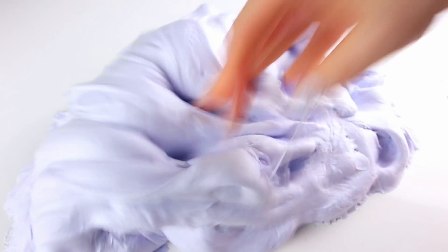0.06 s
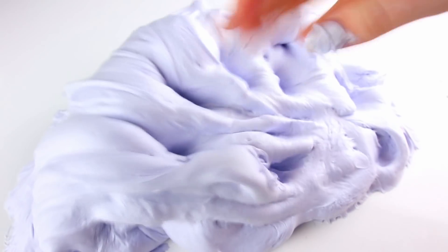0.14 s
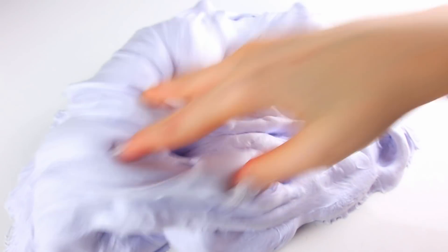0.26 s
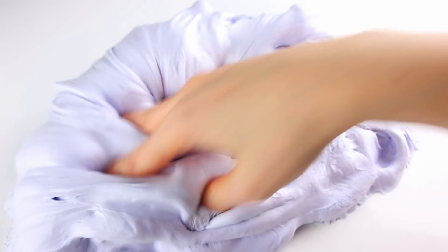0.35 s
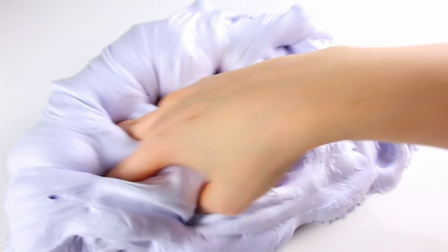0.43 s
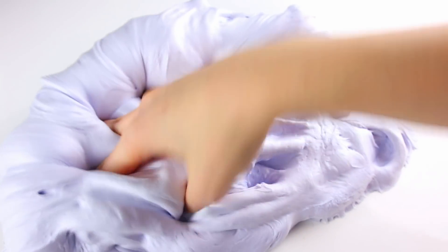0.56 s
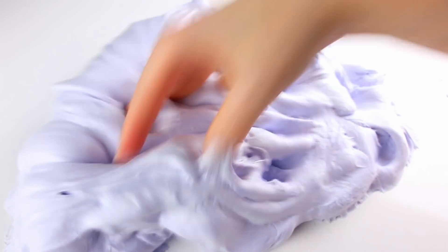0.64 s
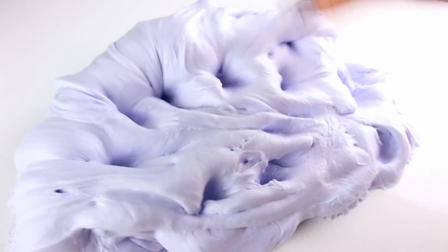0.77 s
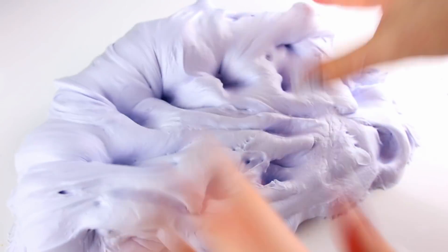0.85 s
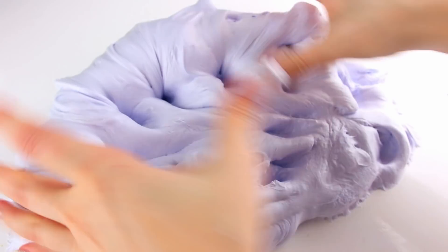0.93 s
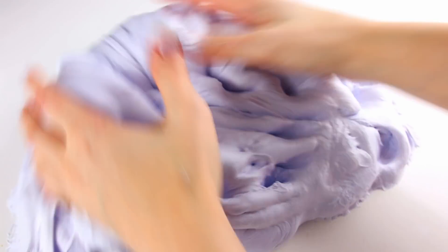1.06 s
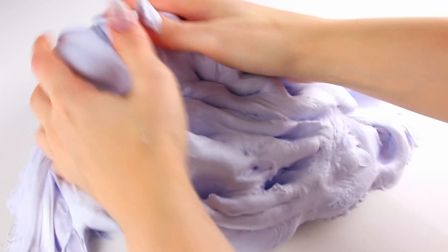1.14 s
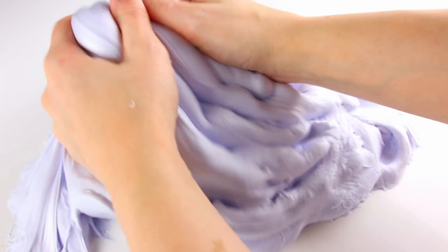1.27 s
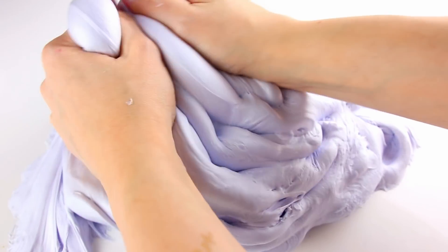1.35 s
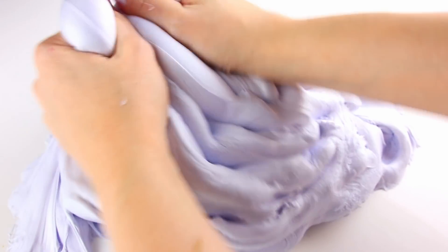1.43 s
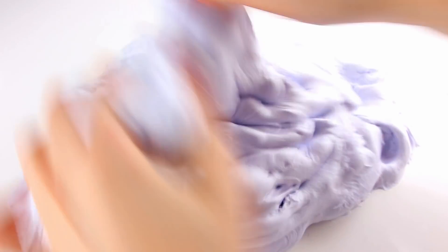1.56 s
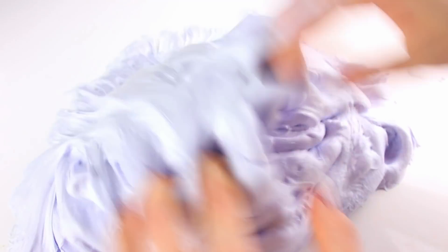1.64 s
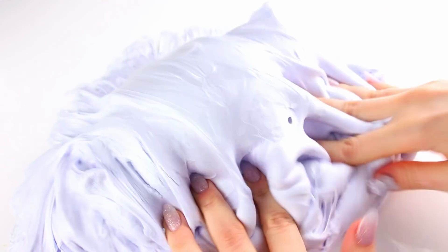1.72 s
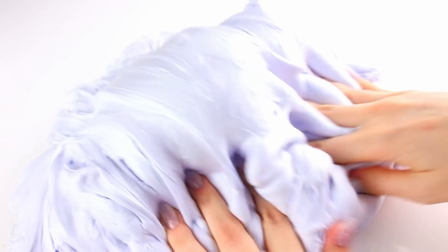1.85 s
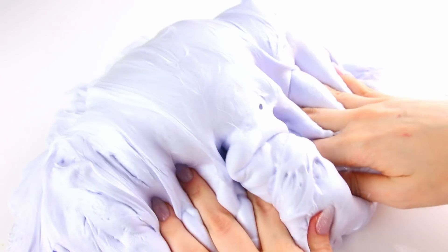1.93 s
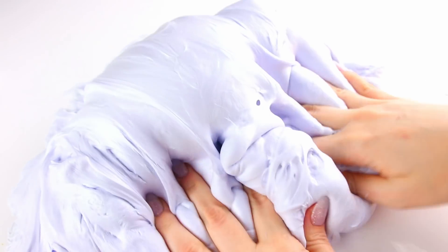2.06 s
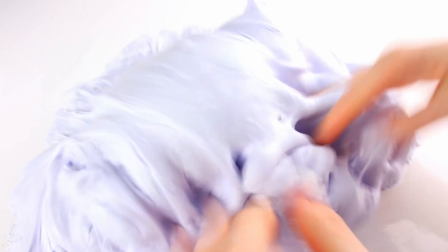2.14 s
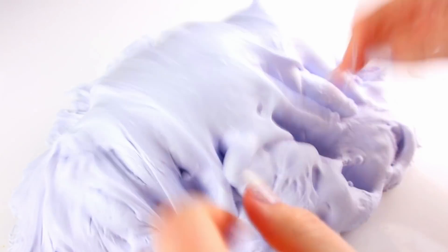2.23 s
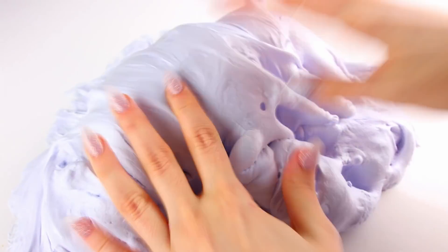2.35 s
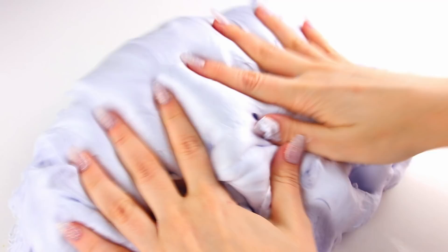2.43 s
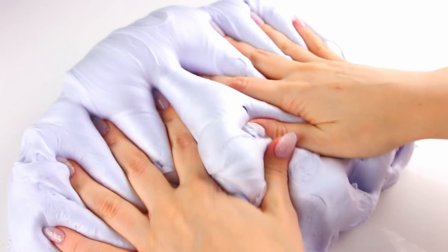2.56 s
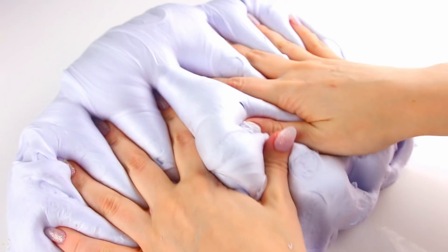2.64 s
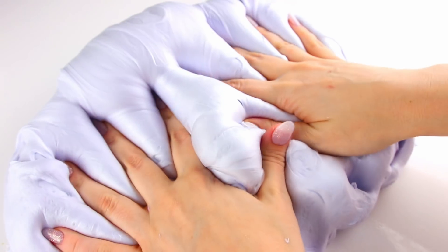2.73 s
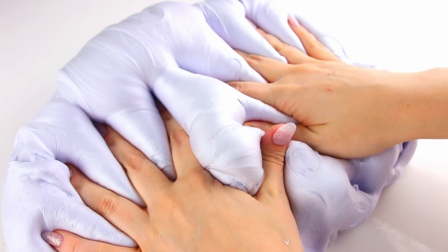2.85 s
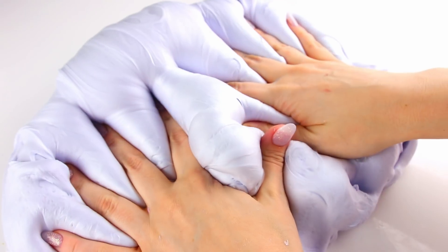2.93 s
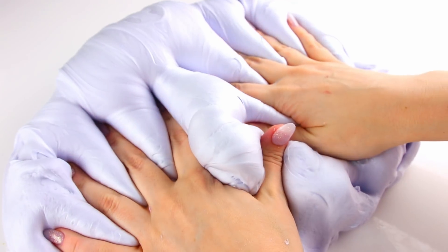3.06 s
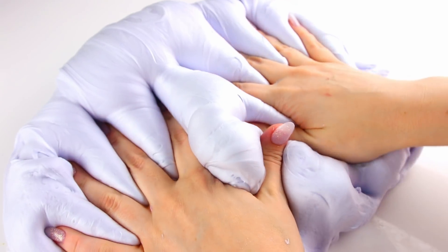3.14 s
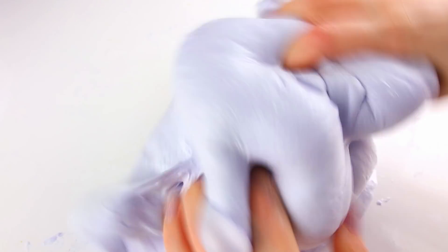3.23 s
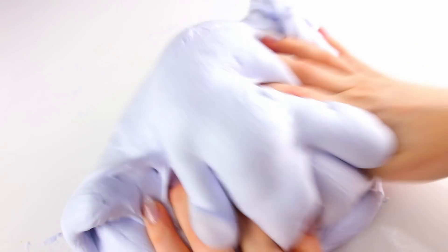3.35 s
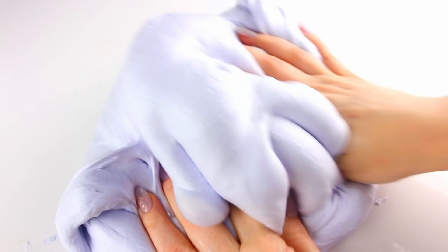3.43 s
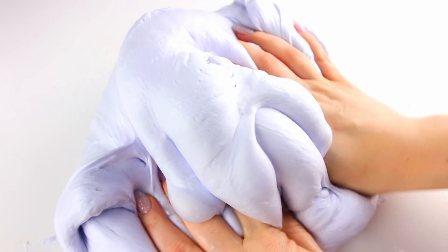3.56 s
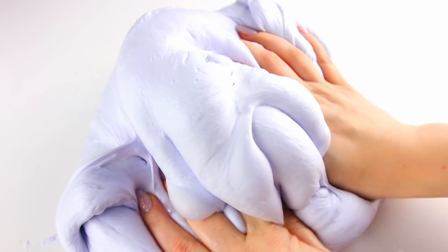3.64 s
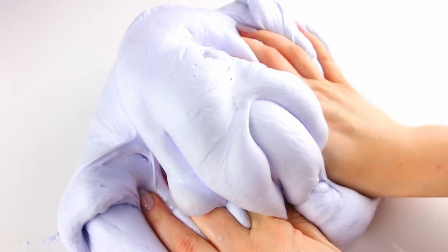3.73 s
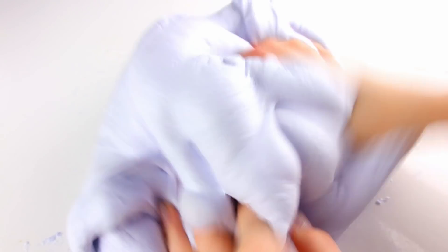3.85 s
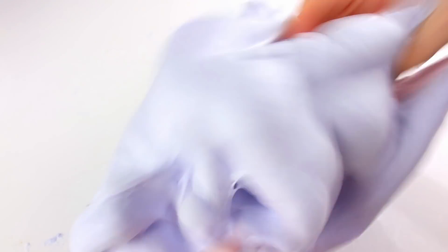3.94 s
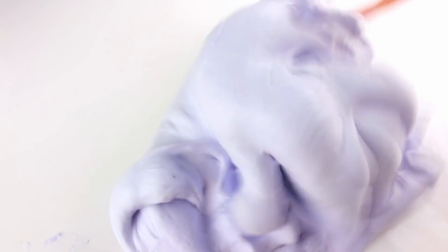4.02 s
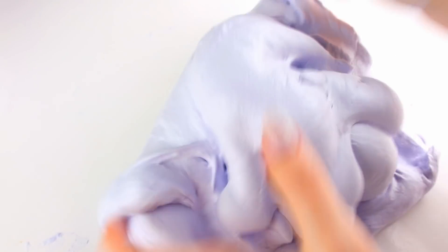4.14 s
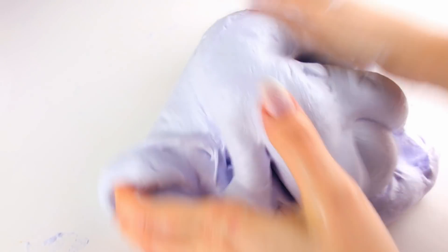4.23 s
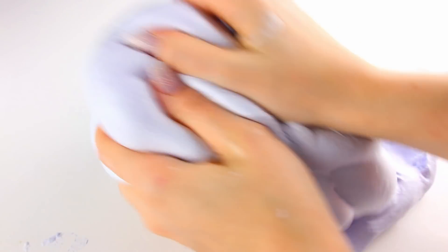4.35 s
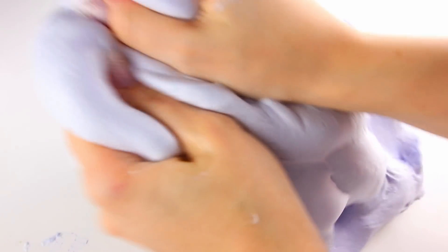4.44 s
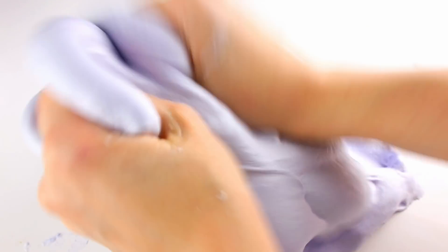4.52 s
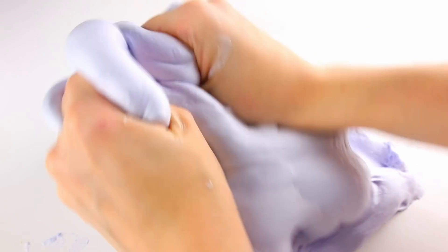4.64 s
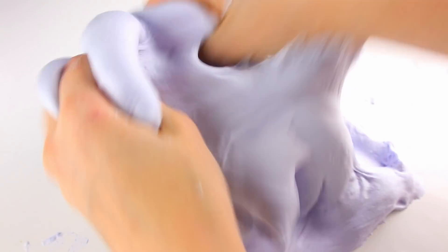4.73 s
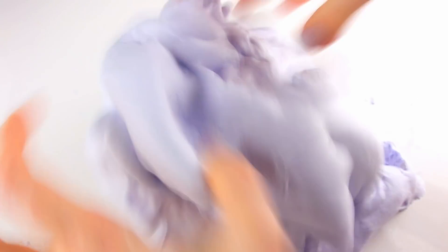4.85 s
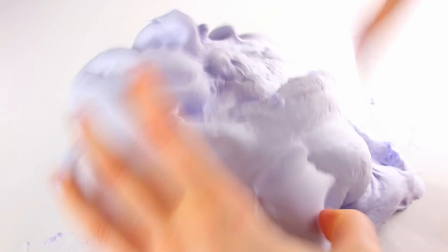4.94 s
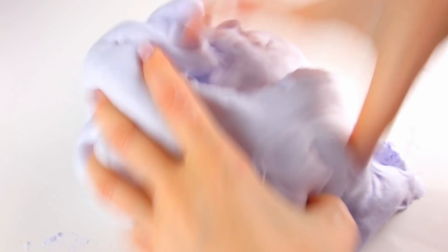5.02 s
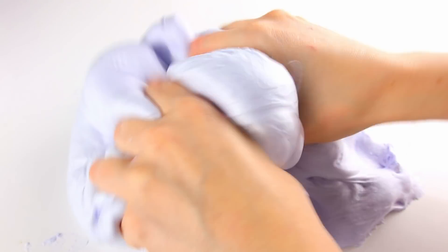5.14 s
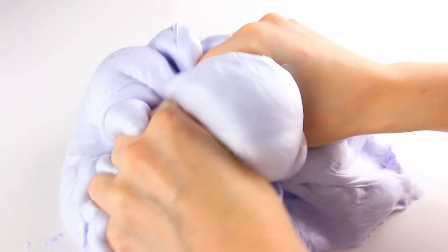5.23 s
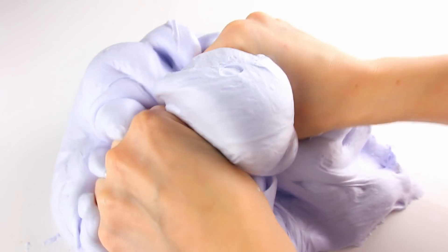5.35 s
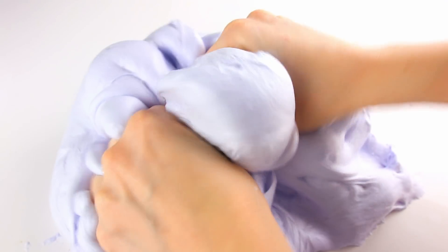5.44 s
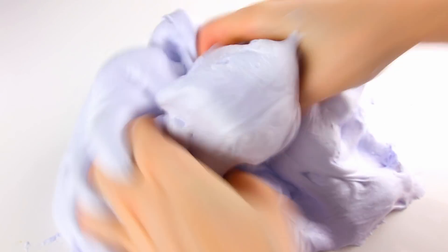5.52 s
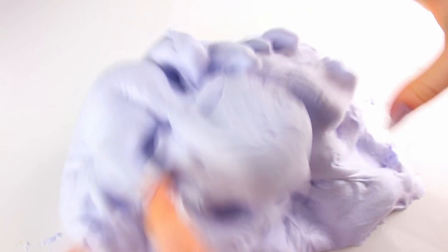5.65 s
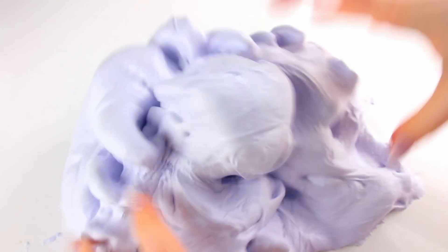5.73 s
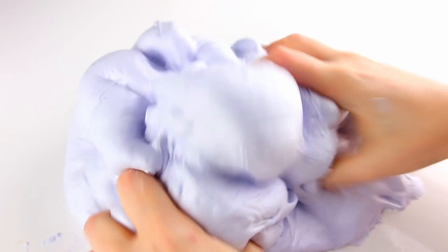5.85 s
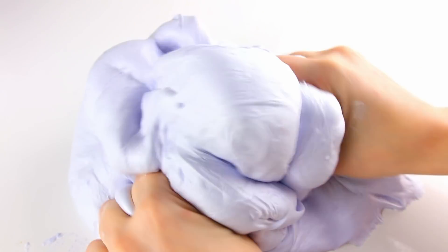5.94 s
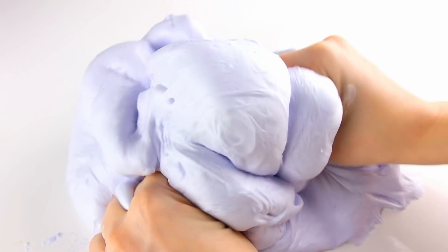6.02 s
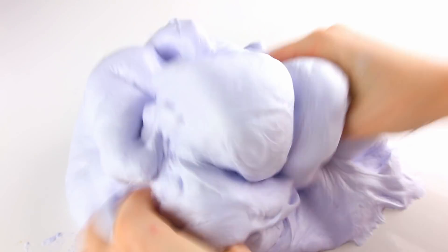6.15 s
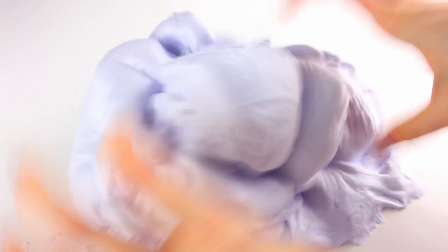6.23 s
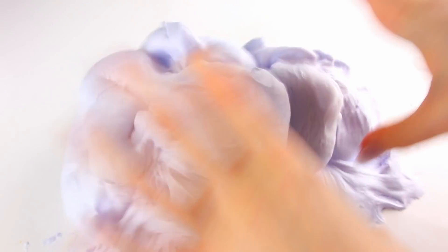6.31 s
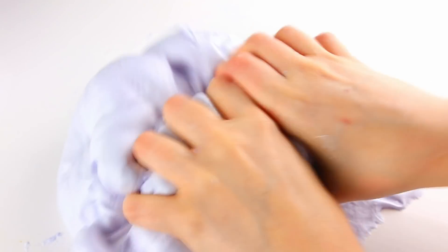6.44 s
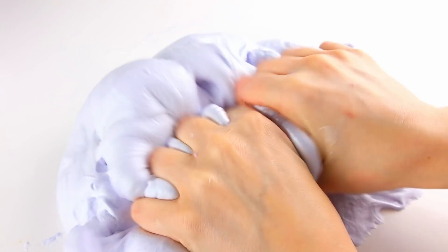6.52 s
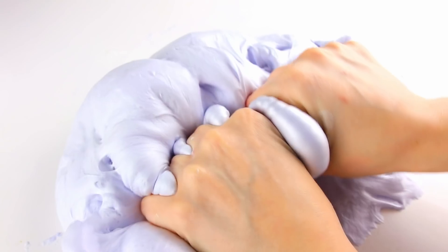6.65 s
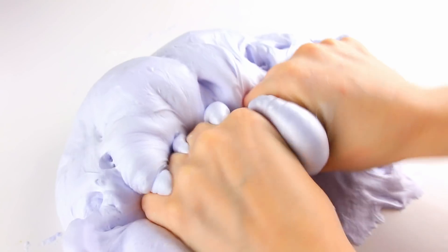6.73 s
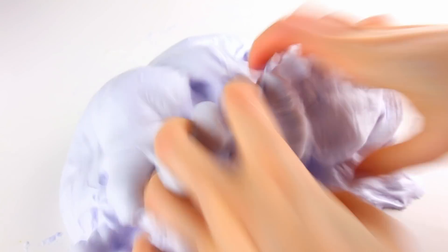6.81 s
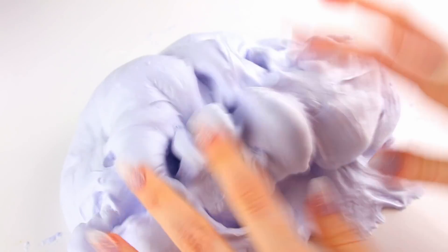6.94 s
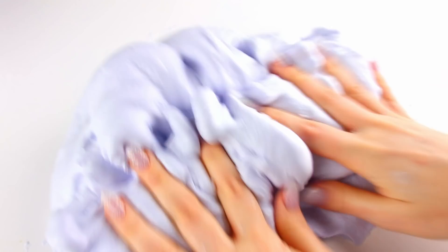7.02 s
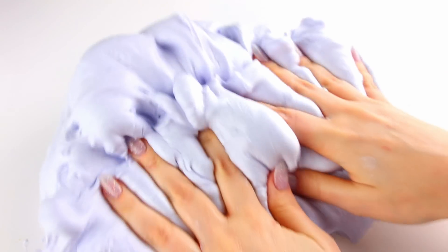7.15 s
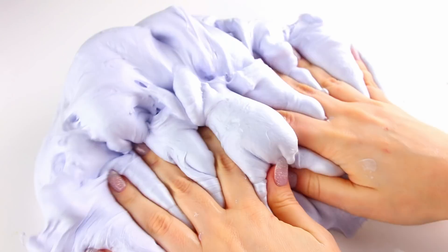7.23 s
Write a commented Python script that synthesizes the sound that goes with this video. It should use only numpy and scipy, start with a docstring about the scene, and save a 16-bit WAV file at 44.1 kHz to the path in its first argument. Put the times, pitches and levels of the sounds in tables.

```python
"""Air pockets pop as hands knead a heap of foamy slime on a table, close to a small microphone.
Each pop is a short snap, a ringing pocket, a thin crack and a push that rings the table top.
Squeezes tear tiny foam cells: random clicks ring as crackle and squelch, with fizz and a dull boom.
Slits whistle, burst pockets hiss and large folds hoot. A short room tail and steady soft noise
surround it all."""
import sys
import numpy as np
from scipy import signal
from scipy.fft import rfft, irfft
from scipy.io import wavfile

SR = 44100
rng = np.random.default_rng(int(sys.argv[2]) if len(sys.argv) > 2 else 0)


def store_pcm(level_fs):
    """Save levels as 16-bit WAV."""
    pcm = np.round(np.clip(level_fs, -1, 1) * 32767).astype(np.int16)
    wavfile.write(sys.argv[1], SR, np.atleast_2d(pcm).T)


N = 321027  # length in samples
HISS_TOP_HZ = 15750  # upper edge of the fizz, the leaks and the room tone

# Bursting air pockets; levels are set before the filters, and the table's ringing is halved later:
# time_s (the sound starts 0.9 ms later), snap_peak_db, snap_pitch_hz, pocket_pitch_hz,
# pocket_ring_db, table_push_db, film_crack_db (ring and crack: rms over 5 ms)
BURSTS = [(0.0433, -19, 4370, 560, -24, -20, -46), (0.0746, -8.5, 3740, 616, -31, -36, -29),
          (0.0862, -19, 3980, 1640, -29, -16.5, -56), (0.0987, -11.5, 3300, 1440, -33, -16, -34),
          (0.117, -8.5, 3480, 615, -38, -26, -35), (0.4513, -15.5, 2300, 1217, -27.5, -25.5, -36),
          (0.642, -11, 3200, 540, -17.5, -30, -26), (0.6858, -0.5, 3870, 1830, -22.5, -16.5, -19),
          (0.6984, -7.5, 3650, 1550, -42, -42, -39), (0.7018, -13.5, 3900, 595, -35, -21, -40),
          (0.993, -42, 2980, 589, -62, -59, -57), (1.0959, -33.5, 3700, 1490, -60.5, -60, -49.5),
          (1.1134, -32.5, 2230, 650, -65, -60, -68), (1.186, -41, 3590, 595, -51, -37, -66),
          (1.1994, -42, 4090, 1430, -46.5, -60, -66), (1.261, -26.5, 2950, 1340, -43, -37, -46.5),
          (1.352, -37, 3890, 1050, -43.5, -35, -49), (1.3906, -21, 3600, 890, -35.5, -30.5, -37.5),
          (1.3988, -40, 3700, 1140, -34, -39, -59), (1.4304, -33, 3710, 563, -42, -34, -59),
          (1.537, -23, 3700, 1310, -53, -26, -57), (1.6024, -31, 3710, 991, -48, -60, -42),
          (1.6846, -26, 3300, 660, -46.5, -51, -60), (1.7382, -18, 2920, 1804, -34, -33, -36.5),
          (1.856, -53, 3320, 2130, -45.5, -52, -50), (1.8835, -28, 3800, 590, -50, -34, -47),
          (1.9554, -14, 3640, 1610, -40, -37, -38), (2.004, -11.5, 4130, 1970, -72, -40, -56),
          (2.1598, -29, 3630, 707, -36, -47, -55), (2.218, -27, 2070, 1660, -40, -43, -37),
          (2.4343, -36, 3880, 875, -51.5, -54, -66), (2.4662, -26, 3030, 1920, -52, -52, -47),
          (2.5607, -30.5, 4470, 600, -42.5, -44, -47), (2.6516, -22, 2800, 1450, -41, -32, -37.5),
          (2.5338, -41, 4020, 580, -63, -55, -48), (2.9295, -41, 3680, 616, -63, -66, -52),
          (3.062, -39.5, 3620, 595, -76.5, -57, -56), (3.1014, -40, 3400, 864, -64, -56, -71),
          (3.1695, -37.5, 3880, 1520, -57, -48, -71), (3.261, -44, 2340, 1780, -56, -65, -73),
          (3.3238, -34, 4240, 563, -54, -57, -63), (3.3985, -44, 2060, 1760, -38, -61, -40),
          (3.4377, -34, 4870, 977, -59, -54, -65), (3.5027, -29, 1990, 590, -42.5, -36, -60),
          (3.5358, -35, 3830, 1390, -54, -53, -58), (3.5624, -42, 2790, 990, -50.5, -35, -60),
          (3.6087, -34.5, 3640, 640, -78, -62, -49), (3.6431, -36.5, 3840, 576, -71, -77, -54),
          (4.0208, -29, 3910, 1200, -46, -44, -46), (4.0665, -14.5, 3900, 1350, -27, -22, -48),
          (4.0706, -16, 3600, 540, -26.5, -42, -43), (4.2531, -31, 3750, 1060, -40, -40, -62),
          (4.341, -5.5, 2780, 602, -25, -23, -59), (4.3688, -21, 3800, 1250, -36, -36.5, -39),
          (4.4623, -33, 2570, 1730, -44, -55, -63), (4.4882, -19, 3020, 1210, -32.5, -31, -46),
          (4.5173, -29, 4000, 1900, -46, -53, -49), (4.5435, -47, 2500, 1110, -46.5, -57, -60),
          (4.558, -40, 3820, 630, -38.5, -43, -35), (4.578, -27, 3340, 830, -35, -57, -59),
          (4.6189, -55, 2270, 1240, -39, -40, -48), (4.8361, -23, 2380, 1320, -29, -52, -49),
          (4.8805, -37, 3210, 895, -40.5, -26, -51), (4.9807, -35, 2400, 1180, -43, -40, -47),
          (5.0743, -38, 4200, 1630, -42, -34, -31), (5.1486, -28, 3020, 574, -38.5, -42, -59),
          (5.1675, -22, 3580, 1930, -52, -52, -55), (5.1806, -17, 3670, 1630, -48, -33, -49),
          (5.1884, -15.5, 3270, 970, -48, -43, -39), (5.2095, -34, 3630, 1390, -34, -51, -29.5),
          (5.244, -25, 2180, 1840, -43, -50, -50), (5.253, -25, 3240, 1600, -32.5, -42, -46),
          (5.2674, -13.5, 2870, 548, -36, -22.5, -49), (5.3751, -19.5, 3070, 934, -37, -46, -56),
          (5.4144, -35, 3670, 1050, -45.5, -54, -48), (5.5271, -18.5, 4040, 560, -47, -21, -46),
          (5.7356, -43, 5590, 560, -42, -32, -37), (5.81, -39, 3890, 1440, -51, -38, -33.5),
          (5.8708, -39, 4130, 1520, -40, -47, -36), (5.897, -10.5, 2550, 910, -30, -22, -64),
          (5.9497, 0, 3430, 2214, -19.5, -34, -53), (5.979, -39, 3500, 1200, -36, -43, -57),
          (6.0366, -27, 3800, 1120, -42.5, -33, -66), (6.0615, -34, 3890, 840, -52, -53, -41),
          (6.2098, -30, 3270, 550, -29, -30, -58), (6.3824, -23, 2590, 1060, -46, -53, -44),
          (6.4025, -24, 3430, 920, -35.5, -56, -52), (6.424, -35, 4270, 566, -27, -13.5, -41),
          (6.4431, -13.5, 2960, 1010, -26.5, -33, -58), (6.4636, -8, 3060, 590, -28.5, -14, -54),
          (6.4651, -3, 4260, 1830, -28, -9.5, -55), (6.527, -37, 3540, 563, -49, -30, -33.5),
          (6.5504, 3.5, 4580, 1770, -37, -29, -29), (6.6128, -43, 3640, 1400, -51, -31, -39),
          (6.6495, -31, 3550, 1710, -64, -56, -40), (6.712, -62, 3980, 1750, -67, -54, -45),
          (7.0343, -33.5, 3550, 890, -43, -45, -59), (7.1713, -34.5, 3820, 573, -69, -56, -45),
          (7.2594, -27, 3480, 1330, -37, -52, -47)]
REBOUND = 0.3  # the far wall snaps too, one pocket cycle later, with this share


def pops():
    """Each burst is a snap, an open pocket ringing upward in pitch, a thin crack and a table push."""
    length = 900  # samples per pop
    air, push = np.zeros(N + length), np.zeros(N)
    t = np.arange(length) / SR
    push_signs = rng.choice([-1, 1], len(BURSTS))
    noises = rng.standard_normal((len(BURSTS), length))
    for burst, sign, noise in zip(BURSTS, push_signs, noises):
        time_s, snap_db, snap_hz, pocket_hz, ring_db, push_db, crack_db = burst
        start = round((time_s + 0.000898) * SR)

        snap = np.sin(2 * np.pi * snap_hz * t) * swell(t, snap_hz, cycles=0.36)
        film_flap = band(noise * np.exp(-t / .0015), 1800, 7000)
        snap += film_flap / 4  # the torn film flaps back
        lag = int(SR / pocket_hz)
        snap[lag:] += REBOUND * snap[:-lag].copy()
        snap /= np.abs(snap).max()

        rising_turn = 2 * np.pi * pocket_hz * t * (1 + 30 * t)
        pocket = np.sin(rising_turn) * swell(t, pocket_hz, cycles=0.42)
        crack = band(noise[::-1] * swell(t, snap_hz, cycles=0.18), 4500, 16400, order=1)

        pop = from_db(snap_db) * snap
        pop += from_db(ring_db) * short_rms_one(pocket)
        pop += from_db(crack_db) * short_rms_one(crack)
        air[start:start + length] += pop
        push[start] += from_db(push_db) * sign
    # the air sound of the pops keeps between 240 Hz and 13 kHz
    return band(air[:N], 240, 13000) + .5 * table(push)


def swell(t, hz, cycles):
    """A rise and fall within a few cycles of a tone, with height 1."""
    u = t * hz / cycles
    return u * np.exp(1 - u)


def short_rms_one(x):
    """Scale a brief sound so that its rms over 5 ms is 1."""
    return x / np.sqrt(np.sum(x ** 2) * 200 / SR)


# Ways the table top rings: pitch_hz, level_db, t60_s (time to fade by 60 dB)
TABLE_MODES = [(148, -12, 0.036), (197, -0.5, 0.035), (262, -2, 0.044), (312, 0, 0.055), (363, 3, 0.021),
               (436.5, -3.5, 0.072), (572, -6.5, 0.025)]


def table(push):
    """A push sets the table top ringing in its low modes, with alternating signs."""
    out = 0
    for k, (hz, db, t60) in enumerate(TABLE_MODES):
        out = out + (-1) ** k * from_db(db) * ring(push, hz, t60)
    return out


def kneading():
    """Tearing foam rings as crackle and squelch and hisses as fizz; the shaken table booms and rumbles."""
    crackle_db, squelch_db, fizz_db, boom_db = efforts()
    clicks = grains(4500, spread_db=2.5, clump_db=3.5)
    crackle = cells(clicks, 2350, 4800, cycles=1.83)
    squelch = cells(grains(1400, spread_db=4.0, clump_db=4.5), 680, 1800, cycles=3.1)

    # the fizz shares the crackle's clicks, blended with smooth noise
    fizz = band(clicks + 0.38 * rng.standard_normal(N), 3800, 7400, order=1)
    fizz = rms_one(band(fizz, 3970, HISS_TOP_HZ, order=4))

    # lone cells keep ticking softly while the foam settles
    ticks = rms_one(band(grains(60, spread_db=4.5, clump_db=4.5), 2500, 13000, order=1))
    tick_db = np.minimum(crackle_db, -58) - 9

    boom = rms_one(table(grains(900, spread_db=5.5, clump_db=1.0)))
    # the stand passes on part of every shake
    rumble = rms_one(band(rng.standard_normal(N), 23, 225))
    rumble_db = -59 + .5 * (boom_db + 52)

    foam = from_db(crackle_db) * crackle + from_db(squelch_db) * squelch
    foam += from_db(fizz_db) * fizz + from_db(tick_db) * ticks
    return foam + from_db(boom_db) * boom + from_db(rumble_db) * rumble


# Squeezes and pulls, levels at their middle:
# start_s, length_s, crackle_db, squelch_db, fizz_db, boom_db
SQUEEZES = [(0.058, 0.066, -38.5, -42.5, -43.5, -37), (0.633, 0.08, -49, -43, -46, -46),
            (1.326, 0.11, -51.5, -68, -59, -55.5), (1.489, 0.15, -41.5, -47, -44, -47),
            (2.152, 0.086, -40, -42, -45, -37.5), (3.856, 0.12, -36, -38.5, -57, -36.5),
            (4.002, 0.051, -50.5, -45, -53.5, -38.5), (4.43, 0.082, -51, -53, -64, -65),
            (4.551, 0.046, -46, -41.5, -49.5, -79), (4.757, 0.13, -39, -39.5, -44.5, -41),
            (5.055, 0.17, -46.5, -47, -53, -48), (5.248, 0.074, -45, -51.5, -48, -51),
            (5.32, 0.097, -49.5, -55, -57, -72), (5.522, 0.11, -36.5, -39, -43.5, -34),
            (5.653, 0.035, -44, -47, -44, -46), (5.804, 0.12, -48.5, -53, -50, -49.5),
            (6.162, 0.093, -37, -44, -46, -40), (6.373, 0.068, -59, -47, -56.5, -58),
            (6.425, 0.09, -37, -35, -67, -35.5), (6.797, 0.082, -36.5, -32, -41, -37.5),
            (7.151, 0.022, -53, -45.5, -57, -52)]
# Pockets that cave in, so the foam tears at once and dies away:
# start_s, fade_db_per_s, crackle_db, squelch_db, fizz_db, boom_db
CAVE_INS = [(0.451, 250, -70, -53, -76, -38.5), (.75, 188, -50.5, -53, -48.5, -42.5),
            (1.74, 303, -46.5, -54, -48, -62), (2.652, 200, -67, -53, -64, -51),
            (4.073, 208, -51, -40, -58, -27), (4.186, 28, -45.5, -66, -51.5, -53),
            (4.343, 56, -48, -47, -62, -61), (5.735, 204, -45, -38, -47, -36.5),
            (5.897, 400, -33, -43, -55, -35), (5.952, 143, -34.5, -55, -62, -42),
            (6.553, 137, -39.5, -60, -41.5, -42)]
# Foam creeping and settling between squeezes: time_s, level_db
SETTLING = [(0, -67.5), (.25, -64.5), (.42, -60.5), (.57, -67.5), (.9, -66.5), (1.3, -58.5), (2.1, -63.5),
            (2.34, -67), (2.52, -57.5), (2.76, -72), (3.25, -70), (3.42, -59), (3.8, -69), (4.7, -60),
            (5.02, -66), (5.5, -61), (6.32, -64.5), (6.75, -62.5), (7.28, -63)]
# Added to the settling level: crackle_db, squelch_db, fizz_db, boom_db
SETTLING_SHARES = [-0.5, -4, -4, -2]
GRIP_DB_PER_S = 559  # rise before a squeeze
LET_GO_DB_PER_S, BOOM_FADE_DB_PER_S = 452, 199  # fall after it: foam, boom
ARCH_DB = 6.5  # a squeeze is this much weaker at its ends than in its middle


def efforts():
    """Levels in dB of crackle, squelch, fizz and boom: squeezes and cave-ins add power to settling foam."""
    t = np.arange(0, N + 64, 64) / SR  # one step every 64 samples
    settling_db = np.interp(t, *np.transpose(SETTLING))
    power = from_db(settling_db + np.array(SETTLING_SHARES)[:, None]) ** 2
    falls = np.array([LET_GO_DB_PER_S] * 3 + [BOOM_FADE_DB_PER_S])[:, None]
    for start, length, *levels_db in SQUEEZES:
        arch = ARCH_DB * np.clip(2 * (t - start) / length - 1, -1, 1) ** 2
        before, after = np.maximum(start - t, 0), np.maximum(t - start - length, 0)
        edges = GRIP_DB_PER_S * before + falls * after
        power = power + from_db(np.array(levels_db)[:, None] - arch - edges) ** 2
    for start, fade, *levels_db in CAVE_INS:
        drop = fade * np.maximum(t - start, 0)
        power = power + (t >= start) * from_db(np.array(levels_db)[:, None] - drop) ** 2
    return [np.interp(np.arange(N) / SR, t, 10 * np.log10(p)) for p in power]


def grains(per_s, spread_db, clump_db):
    """Random clicks of uneven size whose loudness drifts, so they come in clumps."""
    sizes = from_db(spread_db * np.minimum(rng.exponential(1, N), 5))
    signs = rng.choice([-1, 1], N)
    clumps = from_db(clump_db * drift(70))
    happens = rng.random(N) < per_s / SR
    return sizes * signs * happens * clumps


def cells(clicks, low_hz, high_hz, cycles, count=10):
    """Clicks are dealt to cells of many sizes, each fading by 60 dB within a few cycles."""
    dealt = rng.integers(0, count, N)
    pitches = np.geomspace(low_hz, high_hz, count)
    out = 0
    for k, hz in enumerate(pitches):
        out = out + ring(clicks * (dealt == k), hz, cycles / hz)
    return rms_one(out)


# Air whistling out of a slit: start_s, length_s, start_pitch_hz, end_pitch_hz, level_db
WHISTLES = [(5.258, 0.0185, 3050, 3630, -30), (5.278, 0.015, 2650, 3240, -32)]


def squeaks():
    """A short wet whistle with fluttering loudness rises in pitch as the slit closes."""
    out = np.zeros(N)
    flutter = 1 + 0.49 * drift(250)
    for s, length, start_hz, end_hz, db in WHISTLES:
        u = np.linspace(0, 1, int(length * SR))
        pitch = start_hz + (end_hz - start_hz) * u
        tone = np.sin(2 * np.pi * np.cumsum(pitch) / SR)
        fade_in_out = np.sqrt(np.sin(np.pi * u).clip(0))
        start = int(s * SR)
        out[start:start + len(u)] += from_db(db) * tone * fade_in_out
    return out * flutter


# Air rushing out of a burst pocket: start_s, start_level_db, t60_s (time to fade by 60 dB)
AIR_LEAKS = [(4.183, -43.5, 0.25), (5.075, -34, 0.17), (5.7332, -31, 0.21), (5.8092, -37.5, .14),
             (5.870, -39, 0.14)]


def leaks():
    """A bright hiss starts at once and fades as the pocket empties."""
    t = np.arange(N) / SR
    hiss = band(rng.standard_normal(N), 3100, 9500, order=1)
    hiss = rms_one(band(hiss, 3300, HISS_TOP_HZ, order=4))
    gain = np.zeros(N)
    for s, db, t60 in AIR_LEAKS:
        gain += (t >= s) * from_db(db - 60 * np.maximum(t - s, 0) / t60)
    return hiss * gain


# Large folds that trap air and hoot as they close:
# loudest_s, level_db, pitch_hz (at loudest_s), glide_hz_per_s, fade_db_per_s
FOLDS = [(0.109, -24.5, 313, -240, 200), (0.694, -23.5, 312, 297, 445.5), (2.212, -24, 351.5, -700, 227),
         (3.875, -45, 340, -900, 430), (3.952, -28.5, 277.7, 400, 256), (4.11, -35, 344.4, 102.5, 254)]
HOOT_RISE_DB_PER_S = 401


def hollows():
    """Air sloshing in a fold: a low tone of unsteady strength and phase that follows the fold's size."""
    out, t = np.zeros(N), np.arange(N) / SR
    wobble_a, wobble_b = drift(55), drift(55)
    for s, db, hz, glide, fade in FOLDS:
        # the pitch glides only from 0.05 s before the loudest moment to 0.15 s after it
        pitch = hz + glide * np.clip(t - s, -.05, .15)
        turn = 2 * np.pi * np.cumsum(pitch) / SR
        level_db = db - HOOT_RISE_DB_PER_S * np.maximum(s - t, 0) - fade * np.maximum(t - s, 0)
        tone = (0.24 + 0.46 * wobble_a) * np.cos(turn) + 0.89 * wobble_b * np.sin(turn)
        out += from_db(level_db) * tone
    return out


# The room's tail by band, before an overall gain in scene(): centre_hz, level_db (even energy per Hz),
# t60_s (time to fade by 60 dB)
ROOM_BANDS = [(318, -14, 0.14), (710, -16, 0.28), (1520, -15, 0.2), (2500, -40, 0.085), (3900, -14.5, 0.27),
              (6800, -16, 0.092), (11000, -44.5, 0.082)]


def room(x):
    """Dense reflections, modelled as noise, die band by band after a short gap."""
    t = np.arange(SR // 2) / SR
    fade_in = np.clip(t / 0.0018 - .3, 0, 1)  # silent for 0.5 ms, full after 2.3 ms
    reply = 0
    for hz, db, t60 in ROOM_BANDS:
        noise = band(rng.standard_normal(len(t)), hz / 1.45, hz * 1.415)
        dying = noise * from_db(-60 * t / t60) * fade_in
        dying /= np.sqrt(np.sum(dying ** 2))
        reply = reply + from_db(db) * dying * np.sqrt(hz / SR * 2)  # wider bands get more energy
    return signal.fftconvolve(x, reply)[:N]


# Colour of the room tone, only the shape counts: pitch_hz, relative_level_db (per Hz)
AIR_COLOUR = [(18, -49), (30, -21.5), (173, 5), (456, -1), (770, -13.5), (1230, -11.5), (2030, -41),
              (3800, -25.5), (4560, -47), (12000, -35), (15600, -28.5)]
AIR_DB = -56  # overall rms level


def room_tone():
    """Steady, smooth air and microphone noise, made by shaping the spectrum of random noise."""
    hz = np.maximum(np.arange(N // 2 + 1) * SR / N, 1)
    colour_hz, colour_db = np.transpose(AIR_COLOUR)
    gain = from_db(np.interp(np.log(hz), np.log(colour_hz), colour_db))
    gain = gain * (hz < HISS_TOP_HZ)
    return from_db(AIR_DB) * rms_one(irfft(rfft(rng.standard_normal(N)) * gain, N))


def from_db(db):
    """Decibels to gain."""
    return 10 ** (np.asarray(db) / 20)


def rms_one(x):
    """Scale to an rms (average strength) of 1."""
    return x / np.sqrt(np.mean(x ** 2) + 1e-20)


def band(x, low_hz, high_hz, order=2):
    """Keep the sound between two pitches (Butterworth band-pass)."""
    sos = signal.butter(order, [low_hz, high_hz], "band", fs=SR, output="sos")
    return signal.sosfilt(sos, x + 1e-18)  # the tiny offset keeps silence from slowing the filter


def ring(x, hz, t60):
    """A unit click sets a sine of height 1 ringing; it fades by 60 dB in t60 seconds."""
    r = from_db(-60 / (t60 * SR))
    w = 2 * np.pi * hz / SR
    return signal.lfilter([0, np.sin(w)], [1, -2 * r * np.cos(w), r * r], x + 1e-18)


def drift(rate_hz):
    """Slow random wandering with an rms of 1."""
    r = np.exp(-2 * np.pi * rate_hz / SR)
    noise = rng.standard_normal(N + 8000)
    wander = signal.lfilter([1], [1, -2 * r, r * r], noise)
    return rms_one(wander[8000:])  # drop the filter's start-up


# Resonances of the microphone's port: pitch_hz, width_hz, boost_db
MIC_PORT = [(3770, 540, 4), (7240, 1300, 1)]


def scene():
    """Slime through the microphone's port resonances, plus its room tail and the room tone."""
    slime = pops() + squeaks() + leaks() + hollows() + kneading()
    for hz, width_hz, db in MIC_PORT:
        b, a = signal.iirpeak(hz, hz / width_hz, fs=SR)
        slime = slime + (from_db(db) - 1) * signal.lfilter(b, a, slime)
    return (slime + from_db(1.0) * room(slime) + room_tone())[None]


CEILING, CUTOFF_HZ = .8, 17000  # overload limit as a sample value; upper edge


def record(dry):
    """The microphone drops the deepest bass, the loudest pops overload it and the top is cut."""
    lean = signal.sosfilt(signal.butter(4, 38, "high", fs=SR, output="sos"), dry)
    clipped = np.clip(lean, -CEILING, CEILING)
    return signal.sosfilt(signal.cheby2(16, 90, CUTOFF_HZ, fs=SR, output="sos"), clipped)


dry = scene()
out = record(dry)
store_pcm(out)
```